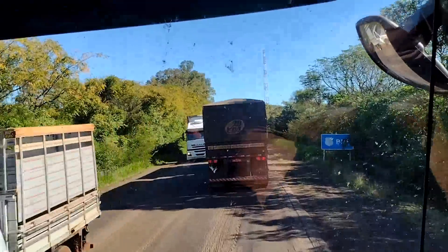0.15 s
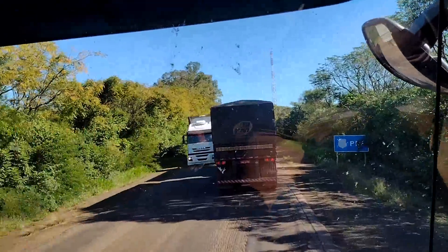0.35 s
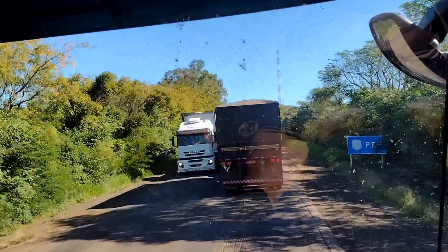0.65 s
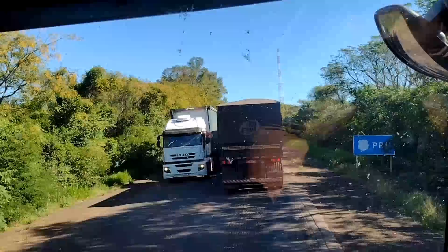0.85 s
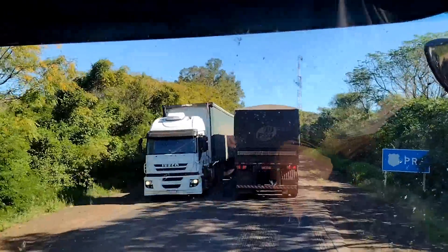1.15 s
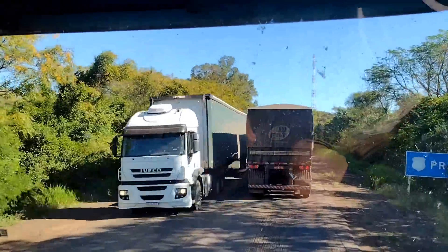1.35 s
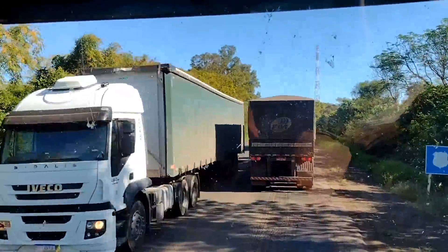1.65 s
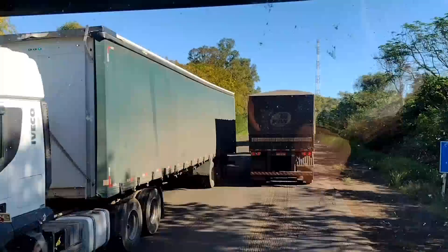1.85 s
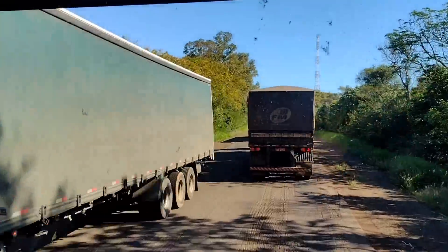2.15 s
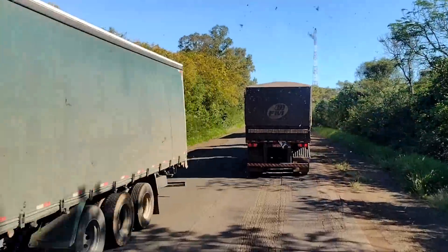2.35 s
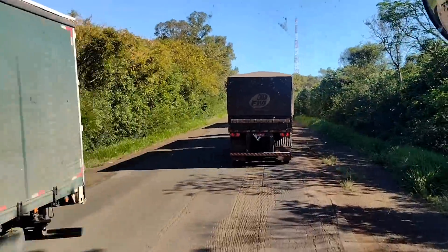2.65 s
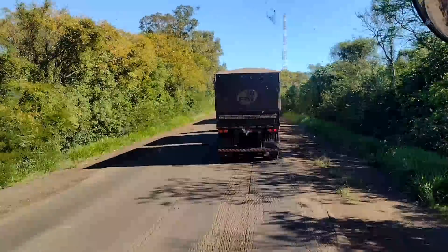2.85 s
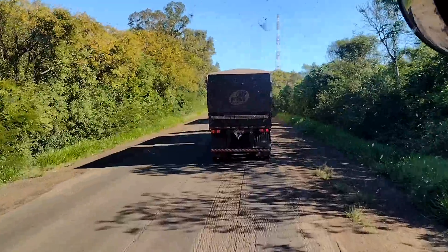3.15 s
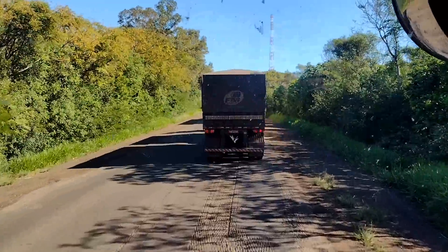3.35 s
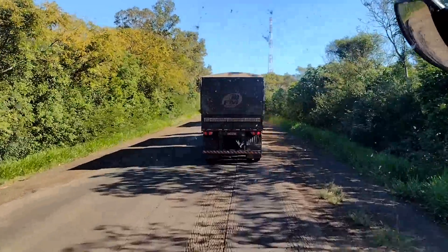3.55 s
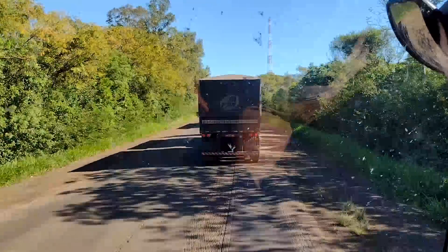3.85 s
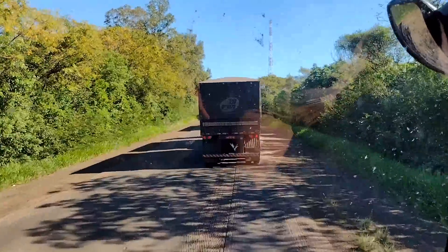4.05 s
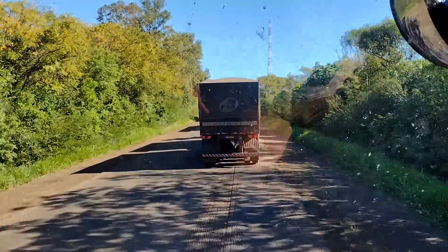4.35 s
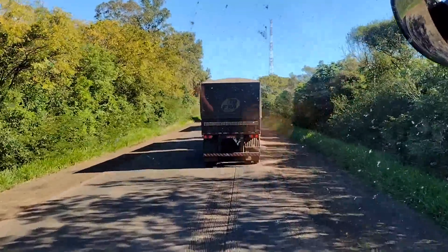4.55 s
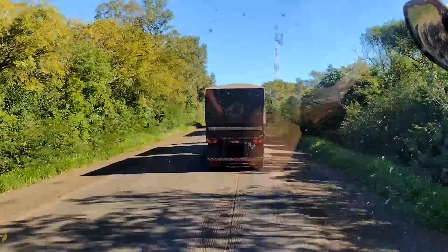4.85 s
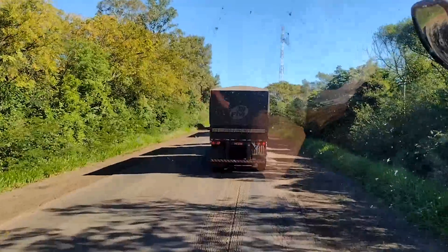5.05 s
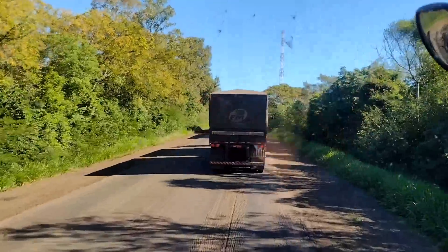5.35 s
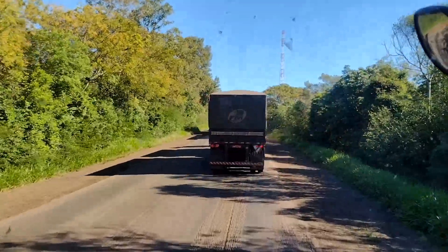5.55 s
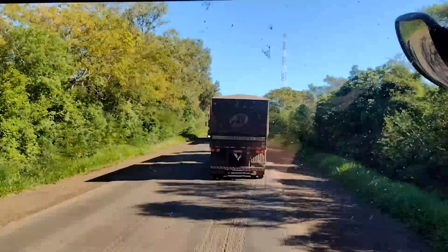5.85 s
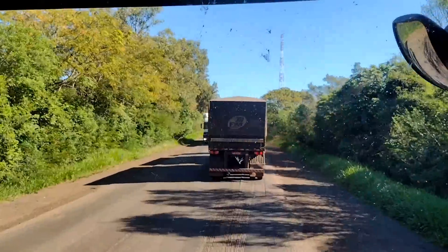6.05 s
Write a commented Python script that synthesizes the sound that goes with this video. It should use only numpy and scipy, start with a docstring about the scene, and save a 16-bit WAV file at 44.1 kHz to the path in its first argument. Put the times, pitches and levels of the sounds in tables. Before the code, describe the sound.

A heavy diesel truck drones low inside its rattling cab as oncoming vehicles rush past, then the engine pulls harder.

```python
"""Inside the cab of a heavy diesel truck on a worn country road. The engine's firings drone low and throb
against the driveline; bumps make the cab boom, trim squeaks and loose fittings click and rattle.
An oncoming vehicle rushes past on the left, its wake slapping the side window. The driver lifts off
and coasts while a second one passes. Then the engine surges and pulls hard, the gears whine,
the panels knock, a latch clacks and a small metal fitting ticks on the jolts."""
import sys
import numpy as np
from scipy import signal
from scipy.fft import rfft, irfft, next_fast_len
from scipy.io import wavfile
from scipy.ndimage import uniform_filter1d, map_coordinates

SR = 44100
rng = np.random.default_rng(int(sys.argv[2]) if len(sys.argv) > 2 else 0)


def generate_wav(sig):
    """Save sig (samples, or channels by samples) to the path in sys.argv[1] as 16-bit PCM at SR."""
    pcm = np.round(np.clip(np.atleast_2d(sig).T, -1, 1) * 32767).astype(np.int16)
    wavfile.write(sys.argv[1], SR, pcm)


N = 273861
TIME = np.arange(N) / SR

# Tone colour of a hard contact, common to the loose fittings: frequency_hz, gain_db
CONTACT_SPECTRUM = [(200, -20), (900, -10.5), (2100, -5.5), (2900, -13), (3500, -7.5), (6300, -6.5),
                    (8200, -6), (10300, -1.5), (12500, -7.5), (15800, -18.5)]


def amp(db):
    """Decibels to gain."""
    return 10 ** (np.asarray(db) / 20)


def unit(x, first=None):
    """Scale to rms 1, over the whole sound or its first samples."""
    return x / np.sqrt(np.mean(x[..., :first] ** 2) + 1e-20)


def along(points, hz):
    """Interpolate (frequency, value) points on a log axis."""
    frequencies, values = np.transpose(points)
    return np.interp(np.log(hz + 1), np.log(frequencies + 1), values)


def curve(points):
    """Join (time, value) points into one value per sample."""
    return np.interp(TIME, *np.transpose(points))


def step(centre_s, length_s):
    """A smooth change from 0 to 1."""
    return .5 + .5 * np.tanh(2 * (TIME - centre_s) / length_s)


def hump(peak_s, width_s):
    """A bell from 0 to 1 and back."""
    return np.exp(-((TIME - peak_s) / width_s) ** 2)


def wobble(rate):
    """A smooth random curve, rate knots a second."""
    return map_coordinates(rng.standard_normal(int(N * rate / SR) + 4), [TIME * rate])


def pan(db):
    """Gains that make the left side db louder than the right."""
    return amp(np.array([[db], [-db]]) / 2)


def add(track, start_s, sound):
    """Mix a sound into a stereo track."""
    part = track[:, max(round(start_s * SR), 0):][:, :sound.shape[-1]]
    part += sound[:, :part.shape[-1]]


def filtered(x, response):
    """Shape x with a complex response of frequency."""
    n = x.shape[-1]
    padded = next_fast_len(n + 8192)
    return irfft(rfft(x, padded) * response(np.fft.rfftfreq(padded, 1 / SR)), padded)[..., :n]


def resonances(modes, hz):
    """Causal response of (centre_hz, width_hz, gain_db) resonances of alternating sign."""
    return sum((-1) ** k * amp(db) * 1j * hz * width / (centre ** 2 - hz ** 2 + 1j * hz * width)
               for k, (centre, width, db) in enumerate(modes))


def diffuse(pair):
    """Spread two noises through the cab: alike at both sides in the bass, unrelated in the treble."""
    # Likeness of left and right: frequency_hz, correlation
    likeness = [(60, 1), (130, 0.9), (290, 0.78), (600, 0.23), (1100, -0.41), (2500, -0.02)]
    angle = lambda hz: np.arccos(along(likeness, hz)) / 2
    mid, side = filtered(pair, lambda hz: np.array([np.cos(angle(hz)), np.sin(angle(hz))]))
    return np.array([mid + side, mid - side])


def rush(spectrum, patchy_db):
    """Stereo noise of rms 1 whose gain varies in random patches of time and frequency."""
    cells = signal.stft(rng.standard_normal((2, N)), nperseg=512)[2]
    patches = uniform_filter1d(rng.standard_normal(cells.shape[1:]), size=4, axis=0)
    patches = uniform_filter1d(patches, size=18, axis=1)
    pair = signal.istft(cells * amp(patchy_db * unit(patches)), nperseg=512)[1][:, :N]
    return unit(filtered(diffuse(pair), lambda hz: amp(along(spectrum, hz))))


def swells(rows, rough_db, bend=0):
    """Noise bands that swell, stutter by rough_db and fade; pitch rises by the share bend as they swell."""
    out = np.zeros((2, N))
    for peak_s, length_s, pitch_hz, width_hz, db in rows:
        arch = np.hanning(int(length_s * SR))
        envelope = np.sqrt(arch) * unit(amp(rough_db * wobble(55)))[:len(arch)]
        noise = rng.standard_normal((2, len(arch)))
        band = filtered(noise, lambda hz: 1 / (1 + (2 * (hz - pitch_hz) / width_hz) ** 2))
        glide = 2 * np.pi * np.cumsum(bend * pitch_hz * (arch - 1)) / SR
        band = np.real(signal.hilbert(band) * np.exp(1j * glide))
        add(out, peak_s - length_s / 2, amp(db - 2) * unit(band) * envelope)
    return out


def blow(response, t60_s, attack_s, direct):
    """A contact's direct spike and its reflections in the cab, rms 1 over the first 5 ms."""
    t = np.arange(SR // 4) / SR
    envelope = (amp(-60 * t / t60_s) + direct * amp(-60 * t / .0027)) * (1 - np.exp(-t / attack_s))
    echo_db = 3 * np.interp(t, t[::16], rng.standard_normal(len(t[::16])))  # unequal echo paths
    burst = diffuse(rng.standard_normal((2, len(t)))) * envelope * amp(echo_db)
    return unit(filtered(burst, response), first=SR // 200)


def ring(modes, attack_s):
    """Struck metal, rms 1 over the first 5 ms; each blow and side gets its own mix of unsteady modes."""
    t = np.arange(SR // 4) / SR
    out = np.zeros((2, len(t)))
    for hz, db, t60_s in modes:
        drift = np.cumsum(.08 * rng.standard_normal(len(t))) + 2 * np.pi * rng.random((2, 1))
        out += amp(db + rng.normal(0, 2, (2, 1)) - 60 * t / t60_s) * np.sin(2 * np.pi * hz * t + drift)
    return unit(out * (1 - np.exp(-t / attack_s)), first=SR // 200)


def engine():
    """The diesel cruises, coasts and pulls; its tones, clatter and gear whine follow the firings."""
    # Engine speed: time_s, firing_hz
    firing_rate = [(0, 51.44), (.55, 50.92), (1.45, 50.56), (1.62, 47.8), (3.3, 47.36), (3.5, 55.14),
                   (4.7, 57.38), (5.5, 57.55), (6.17, 57.53)]
    lift_s, pull_s, pedal_s, ease_s = 1.65, 3.36, .04, .98
    cruise_hz = 52.32
    coasting = step(lift_s, pedal_s) - step(pull_s, pedal_s)
    pressing = step(pull_s, pedal_s) * np.exp(-(np.maximum(TIME - pull_s, 0) / ease_s) ** 2)
    effort_db = -6.5 * coasting + .5 * pressing
    firing_hz = curve(firing_rate)
    above_cruise_hz = firing_hz - cruise_hz
    phase = 2 * np.pi * np.cumsum(firing_hz) / SR + .054 * wobble(22)
    phase -= phase[round(.09 * SR)]  # the throb first swells at 0.09 s
    tones = drone(phase, above_cruise_hz, effort_db) + overtones(phase, above_cruise_hz, effort_db)
    return np.sqrt(2) * tones * pan(-1.8) + clatter(phase, effort_db) + gear_whine(phase)


def drone(phase, above_cruise_hz, effort_db):
    """The firing tone and its octave fill the cab; a driveline tone just below beats against it."""
    # Strength of the firing tone: time_s, relative_db
    firing_levels = [(0, -18), (.7, -17), (1.3, -17.5), (1.7, -22), (3.2, -21.5), (4.1, -21), (4.6, -14),
                     (6.2, -12.5)]
    # Brief dips of the drone while coasting: time_s, gain_db
    dips = [(1.985, -17), (2.42, -12), (2.66, -9)]
    firing_db = curve(firing_levels) + 9 * hump(3.44, .048)  # a surge as it takes up the load
    swell_db = firing_db + 15  # relative to steady running
    uneven_db = .5 * wobble(40) * amp(-swell_db)  # firings scatter more at light load
    firing = amp(firing_db - 2 + uneven_db) * np.cos(phase)
    octave_db = -42.5 + 2.5 * above_cruise_hz + .7 * swell_db + effort_db
    octave = amp(octave_db + .25 * wobble(25)) * np.cos(2 * phase)
    driveline = amp(-27.5 - 2.5 * np.abs(above_cruise_hz)) * np.cos(.908 * phase)
    dip_db = sum(db * hump(time_s, .045) for time_s, db in dips)
    return (firing + octave + driveline) * amp(dip_db)


def overtones(phase, above_cruise_hz, effort_db):
    """Weaker engine tones waver, sinking when the driver lifts off and above cruising speed."""
    # Upper engine tones: firing_multiple, relative_db
    partials = [(2, -39), (2.5, -49), (3, -41), (4, -55)]
    fade_db = effort_db - .8 * np.maximum(above_cruise_hz, 0)
    return sum(amp(db + fade_db + 1.8 * wobble(9)) * np.cos(multiple * phase + .3 * wobble(8))
               for multiple, db in partials)


def clatter(phase, effort_db):
    """Each firing shakes a burst of diesel clatter out of the block."""
    # Engine block resonances: centre_hz, width_hz, gain_db
    block_modes = [(1120, 120, 0), (2040, 290, -12), (3870, 300, -20)]
    bursts = amp(3 * np.cos(phase) + 2 * np.cos(phase / 6) + 2.5 * wobble(30))  # six unequal cylinders
    shaking = diffuse(rng.standard_normal((2, N))) * bursts
    block = unit(filtered(shaking, lambda hz: resonances(block_modes, hz)))
    return amp(-58 + effort_db) * block * pan(-9.5)


def gear_whine(phase):
    """The gears sing under load in short wavering chirps, pulsing with the firings."""
    # Strength of the whine: time_s, level_db
    whine_levels = [(.6, -62), (1.4, -52.5), (1.7, -68), (3.25, -72), (3.42, -54), (4.4, -51.5), (6.2, -57)]
    pitch_hz = 1183 + 19 * wobble(60)
    chirps = unit(amp(7 * np.tanh(wobble(32) - .5) + 3.5 * np.cos(phase)))
    side_phase = np.array([[1], [-1]]) + .3 * np.array([wobble(50), wobble(50)])
    tone = np.sqrt(2) * np.cos(2 * np.pi * np.cumsum(pitch_hz) / SR + side_phase)
    return amp(curve(whine_levels)) * chirps * tone * pan(-6)


def road():
    """The rough surface makes the cab boom and the tyres roar, more at each bump."""
    # Colour of the cab boom: frequency_hz, density_db
    boom_spectrum = [(15, -5), (28, 6.5), (46, -3), (65, -0.5), (88, -9.5), (125, -1), (160, -11.5),
                     (215, -19), (400, -67.5)]
    # Colour of the tyre roar: frequency_hz, density_db
    roar_spectrum = [(120, -43.5), (220, 3.5), (330, -1.5), (490, -3), (600, -10), (1000, -7.5),
                     (1400, -16), (2200, -19.5), (2900, -30), (6000, -60.5)]
    # Bumps in the road: peak_s, boom_rise_db, roar_rise_db
    bumps = [(.15, 3, 4.5), (.7, 7.5, 4.5), (.95, 1.5, 6), (1.35, 5, 6), (2.3, 3.5, 8), (2.8, 7, 2.5),
             (3.39, 8, -0.5), (3.85, 2, 5.5), (4.63, 3, 4), (5.63, 7, 2.5), (5.92, 6, 2)]
    boom_db, roar_db = -30.5, -46
    rise_s, settle_s = .033, .1
    for peak_s, boom_rise_db, roar_rise_db in bumps:
        shake = hump(peak_s, np.where(TIME < peak_s, rise_s, settle_s))
        boom_db += boom_rise_db * shake
        roar_db += roar_rise_db * shake
    jolts = wobble(22)
    boom = amp(boom_db + jolts) * rush(boom_spectrum, patchy_db=1) * pan(-.83)
    roar = amp(roar_db + .86 * jolts + wobble(60)) * rush(roar_spectrum, patchy_db=1.5) * pan(-1.5)
    return boom + roar


def air():
    """The smooth hiss of moving air."""
    # Colour of the hiss: frequency_hz, density_db
    hiss_spectrum = [(1500, -14), (2900, -1), (4000, 2), (6300, -1.5), (8000, 2), (10200, 4.5), (12500, -3),
                     (15800, -9)]
    return rush(hiss_spectrum, patchy_db=.8)


def seal_leak():
    """Air flutters faintly past the window seals."""
    # Strength of the leak: time_s, level_db
    leak_levels = [(0, -54), (1.6, -56), (3.2, -61.5), (3.8, -56.5), (4.1, -66.5), (6.2, -63)]
    return amp(curve(leak_levels) + 1.6 * wobble(25)) * air()


def trim_squeaks():
    """Rubbing trim gives thin, hoarse squeaks that bend up as they swell."""
    # Rubs of the trim: peak_s, length_s, pitch_hz, width_hz, relative_db
    rubs = [(.035, .07, 4990, 180, -49), (.17, 0.27, 4210, 200, -52.5), (.2, 0.097, 7200, 450, -52),
            (.79, 0.076, 3370, 160, -51), (1.35, 0.16, 4600, 400, -52), (1.445, 0.13, 13080, 450, -50),
            (1.512, 0.005, 11170, 1300, -23.5), (2.865, 0.053, 9400, 1200, -46),
            (4.302, 0.075, 6600, 3504, -47.5)]
    return swells(rubs, rough_db=4.5, bend=.018)


def fittings():
    """Loose fittings snap against the dash and ring briefly, with a soft rebound or in bursts."""
    # Sharp contacts: start_s, relative_db, brightness_db_per_octave
    clicks = [(0.298, -52, 15), (.398, -35.5, -1.5), (0.954, -28, 8), (1.039, -41, 4), (1.0959, -26, 4.5),
              (1.686, -46.5, 0), (2.022, -53, 13), (2.9158, -32.5, 7), (3.087, -43, -5), (3.537, -39.5, 12),
              (3.707, -42.5, 16), (3.7397, -35, 0), (3.823, -24, 4.5), (3.853, -38.5, -1.5),
              (4.34, -28, -0.5)]
    # Bursts of chatter: start_s, contacts, gap_s, first_db, growth_db_per_contact, brightness_db_per_octave
    rattles = [(0.465, 4, 0.019, -38, 0.5, 3.5), (0.782, 3, 0.026, -39.5, -1.5, 3.5),
               (3.906, 4, .0118, -33.5, 1, -0.5)]
    # Ringing modes of the fitting: pitch_hz, gain_db, t60_s
    fitting_modes = [(3600, -8, .06), (3854, -8, .08), (7350, -6, .06), (8180, -3, .06), (8565, -5, .06),
                     (9189, -5, .075), (10110, 0, .06), (10620, -1, .045)]
    rebound_s, rebound_db = .035, -23.5
    rebounds = [(start_s + rebound_s, db + rebound_db, bright) for start_s, db, bright in clicks]
    chatter = [(start_s + k * gap_s, db + k * growth_db, bright)
               for start_s, count, gap_s, db, growth_db, bright in rattles for k in range(round(count))]
    out = np.zeros((2, N))
    for start_s, db, bright in list(clicks) + rebounds + chatter:
        tilt_db = lambda hz: bright * np.log2(np.clip(hz, 200, 16000) / 1000)
        colour = lambda hz: amp(along(CONTACT_SPECTRUM, hz) + tilt_db(hz))
        snap = blow(colour, t60_s=.075, attack_s=.0014, direct=1.2)
        modes = [(hz, gain_db + tilt_db(hz), t60_s) for hz, gain_db, t60_s in fitting_modes]
        add(out, start_s, amp(db + .5) * snap + amp(db - 3.5) * ring(modes, attack_s=.0014))
    return out * pan(-1.2)


def traffic():
    """Passing tyres and stirred air fade with distance, heard diffusely and through the side window."""
    # Oncoming wheels drawing level with the window: pass_s, tyre_db, hiss_db
    axles = [(.47, -41.5, -50), (.67, -42, -42.5), (.82, -42.5, -76.5), (2.24, -45, -47),
             (2.47, -39.5, -46.5), (2.77, -40.5, -45.5), (3.02, -46.5, -50.5)]
    # Colour of their tyre rush: frequency_hz, density_db
    tyre_spectrum = [(150, -27), (280, 1.5), (480, 2), (1000, 0.5), (1300, -1), (2300, -5.5), (2900, -21),
                     (4500, -49)]
    gap_m, closing_m_per_s = 1.91, 23.6
    shield_db, shield_s = -9.5, .61  # once behind, the wheels are screened by the cab
    power = np.zeros((2, N))
    for pass_s, tyre_db, hiss_db in axles:
        nearness = gap_m / np.hypot(gap_m, closing_m_per_s * (TIME - pass_s))
        screening = amp(shield_db * step(pass_s + shield_s, shield_s))
        power += (amp([[tyre_db], [hiss_db]]) * nearness * screening) ** 2
    tyre_gain, hiss_gain = np.sqrt(power)
    grit = unit(amp(1.5 * wobble(260)))  # dust thrown at the cab

    def passing():
        tyres = tyre_gain * amp(.22 * wobble(29)) * rush(tyre_spectrum, patchy_db=2)
        turbulence = amp(1.8 * wobble(35))
        return tyres * pan(-4) + hiss_gain * turbulence * grit * air() * pan(-1.9)

    lead_s = .00047 * np.array([[.5], [-.5]])  # the straight path reaches the left side first
    straight = filtered(passing()[0], lambda hz: np.exp(2j * np.pi * hz * lead_s))
    return passing() + amp(-8) * straight


def tread_song():
    """The passing vehicles' tread and drone sing, stuttering on the broken surface."""
    # Singing bands: peak_s, length_s, pitch_hz, width_hz, relative_db
    bands = [(.67, 0.37, 990, 161, -45), (.67, 0.45, 2370, 300, -42), (1.42, 0.45, 2310, 240, -49.5),
             (2.6, .85, 200, 30, -43), (2.84, .92, 725, 85, -44.5), (2.55, .85, 1890, 220, -49.5),
             (2.77, .11, 1925, 150, -43.5), (2.94, .1, 1965, 100, -43)]
    return swells(bands, rough_db=2.5) * pan(-1.4)


def wake_slap():
    """The first vehicle's wake slaps the side window with a broad puff of noise."""
    peak_s, length_s, centre_hz, width_hz, relative_db = .675, .23, 4330, 7200, -40.5
    return swells([(peak_s, length_s, centre_hz, width_hz, relative_db)], rough_db=0) * pan(-1.4)


def panels():
    """Harder bumps knock the cab's hollow panels; softer blows sound lower."""
    # Blows on the panels: start_s, relative_db, centre_hz
    knocks = [(.956, -36, 2000), (1.10, -35, 2000), (1.562, -41, 620), (2.90, -36.5, 1000),
              (3.922, -34.5, 600), (3.934, -33.5, 430), (3.950, -36, 460), (4.444, -36.5, 1400),
              (4.635, -43.5, 1000), (5.62, -44, 600), (5.663, -39.5, 1000)]
    # Panel resonances: centre_hz, width_hz, gain_db
    panel_modes = [(300, 600, -1), (410, 80, 9), (530, 90, 8), (820, 110, 4), (1056, 110, 4),
                   (1310, 160, 2), (1567, 110, -1), (1990, 300, 0)]
    skirt_db = -11  # one octave from a blow's centre
    out = np.zeros((2, N))
    for start_s, db, centre_hz in knocks:
        skirt = lambda hz: amp(skirt_db * np.log2((hz + 1) / centre_hz) ** 2)
        colour = lambda hz: resonances(panel_modes, hz) * skirt(hz)
        add(out, start_s, amp(db - 3) * blow(colour, t60_s=.09, attack_s=.001, direct=.6))
    return out * pan(-1)


def trinket():
    """A small metal fitting ticks on the jolts and chatters faintly; longer ticks ring more."""
    # Its clearest ticks: start_s, relative_db, t60_s
    ticks = [(4.122, -59.5, .12), (4.15, -60.5, 0.068), (4.883, -58.5, 0.099), (4.999, -61, 0.054),
             (5.4576, -58, 0.072), (5.634, -60.5, 0.063), (5.694, -60, 0.029), (5.794, -62, .13),
             (6.036, -58, 0.04)]
    # Its resonances: centre_hz, width_hz, gain_db
    metal_modes = [(5460, 210, -10), (9600, 540, 2.5), (10100, 99, -2), (11300, 200, -2)]
    chatter = [(when * N / SR, -70 + 7 * size, .05) for when, size in rng.random((110, 2))]
    out = np.zeros((2, N))
    for start_s, db, t60_s in list(ticks) + chatter:
        ringing = 30 * t60_s
        colour = lambda hz: amp(along(CONTACT_SPECTRUM, hz)) * (1 + ringing * resonances(metal_modes, hz))
        add(out, start_s, amp(db + 9) * blow(colour, t60_s=t60_s, attack_s=.001, direct=.5))
    return out


def latch():
    """A steel latch drops home and rings."""
    # Modes of the steel: pitch_hz, gain_db, t60_s
    steel_modes = [(4188, -4, .05), (4452, -4, .05), (4651, 1, .06), (7827, 0, .05), (10310, -1, .05),
                   (11920, -1, .05)]
    out = np.zeros((2, N))
    add(out, start_s=4.3395, sound=amp(-33) * ring(steel_modes, attack_s=.0017))
    return out


def scene():
    """Everything as heard behind the windscreen."""
    driving = engine() + road() + seal_leak()
    oncoming = traffic() + tread_song() + wake_slap()
    cab = trim_squeaks() + fittings() + panels() + trinket() + latch()
    return driving + oncoming + cab


def record(dry):
    """Thin the deepest bass and cut off the very top."""
    bass_cut_hz, top_hz = 32, 15900
    return filtered(dry, lambda hz: 1j * hz / (bass_cut_hz + 1j * hz) / (1 + (hz / top_hz) ** 160))


dry = scene()
out = record(dry)
generate_wav(out)
```